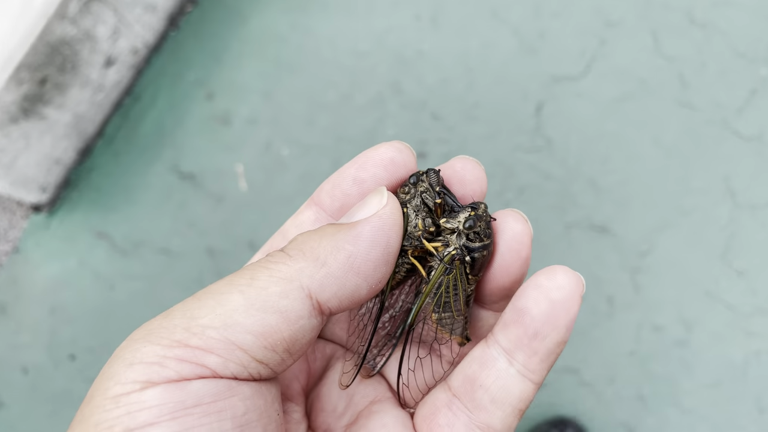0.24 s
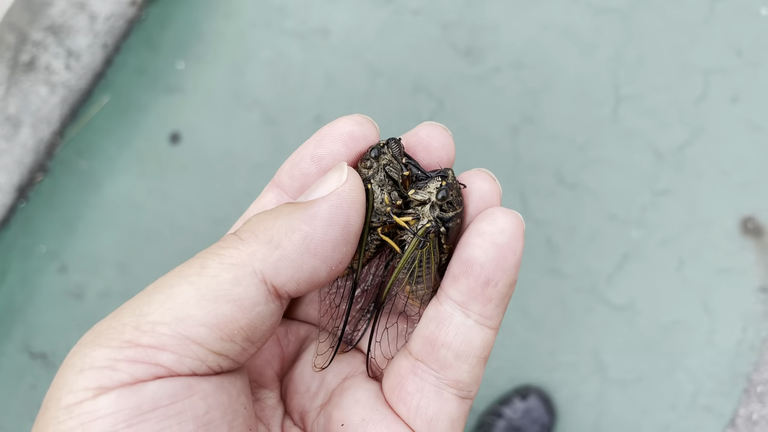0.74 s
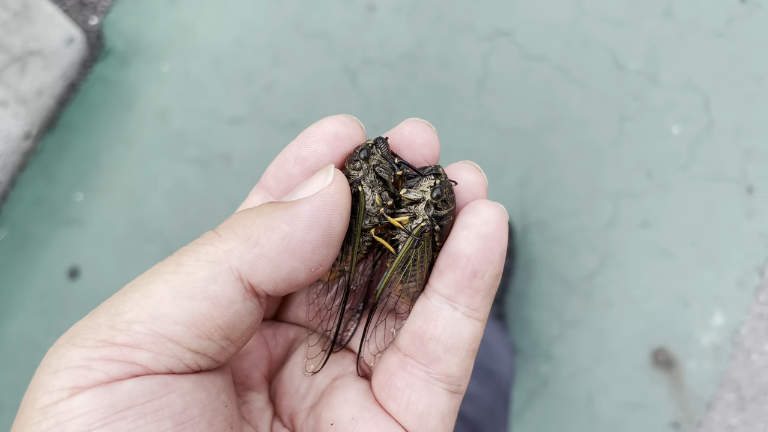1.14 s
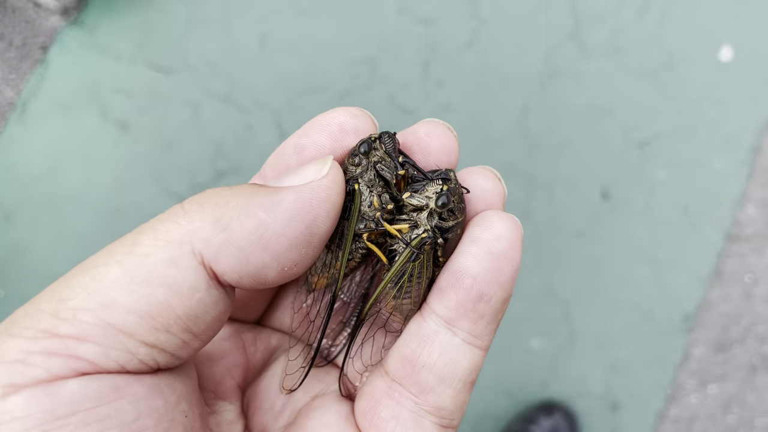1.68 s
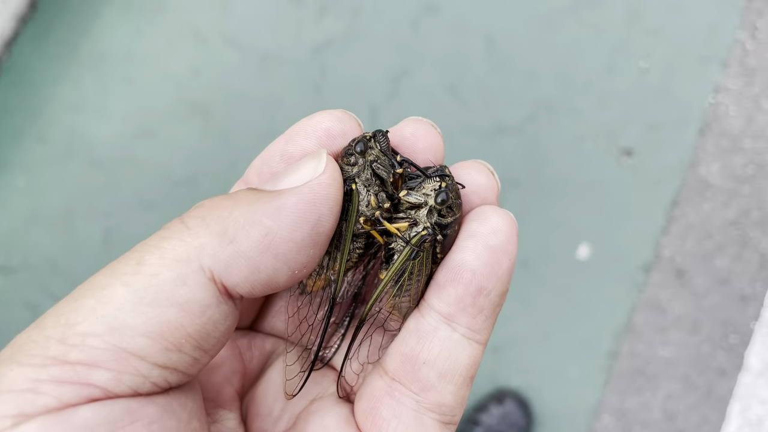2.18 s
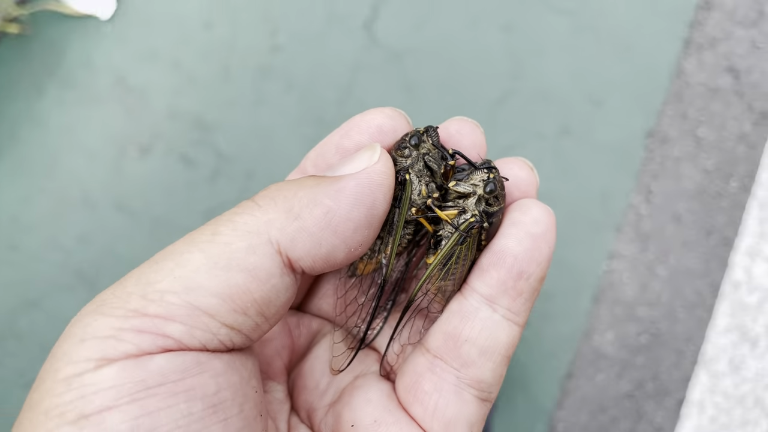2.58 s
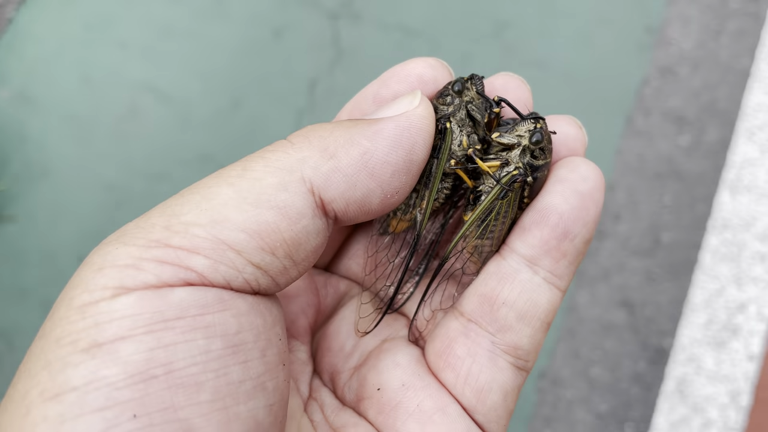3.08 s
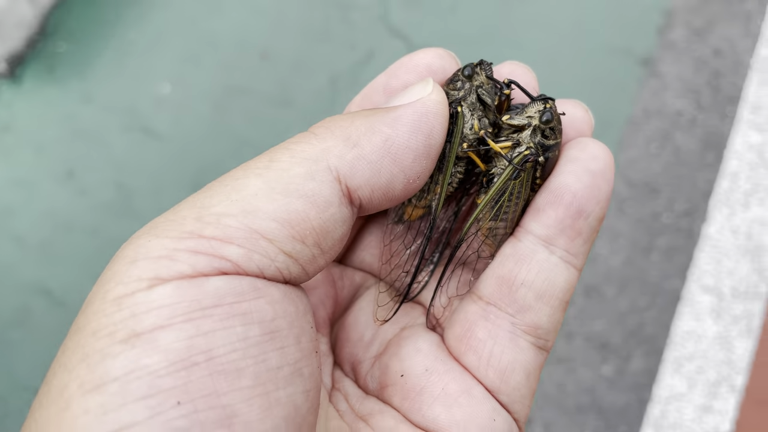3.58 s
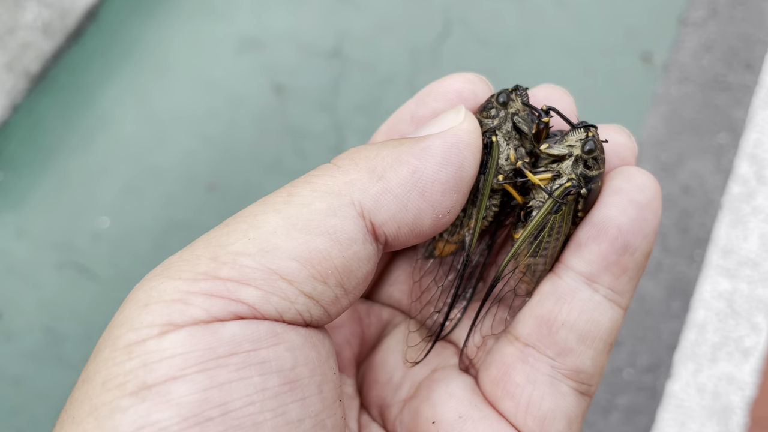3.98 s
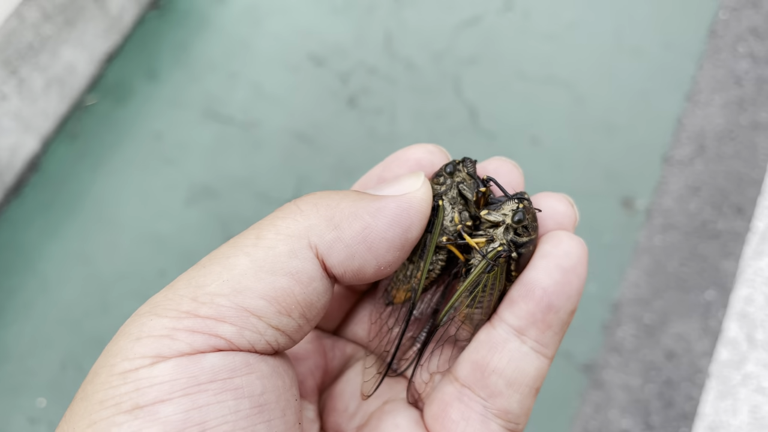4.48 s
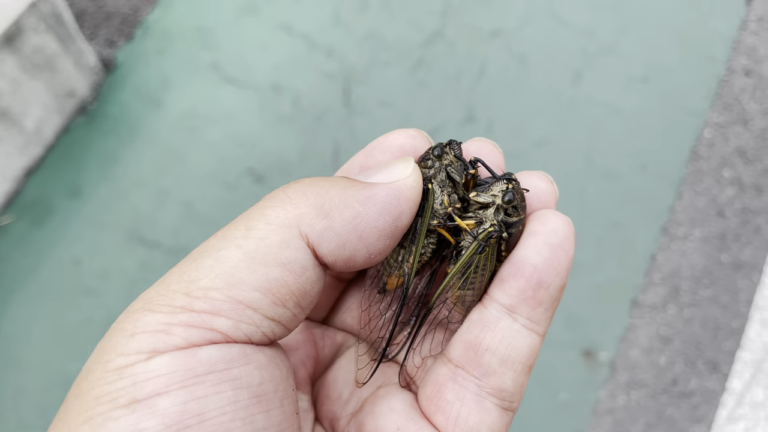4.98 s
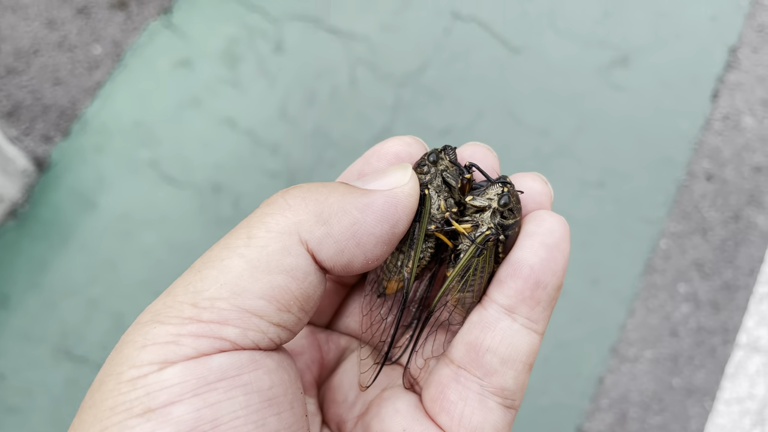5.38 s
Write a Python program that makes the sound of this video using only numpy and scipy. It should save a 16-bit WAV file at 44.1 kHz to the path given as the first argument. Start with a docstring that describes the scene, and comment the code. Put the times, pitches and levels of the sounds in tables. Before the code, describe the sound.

Close phone microphone outdoors: a hand-held cicada rasps in rapid bright ticks fused into buzzing bouts, alternating with slower sputtering clicks. It stops after roughly two and a half seconds. A quiet stretch holds only thin distant insect hiss, low town rumble and soft wind puffs. One brief buzz returns late, followed by two isolated dry clicks, and a stronger low wind thump closes the scene.

```python
"""A cicada buzzes loudly up close, stutters, falls quiet, then gives one last short burst and two clicks.
It is a large one, held in a hand close to a phone outdoors. Its two tymbals buckle in turn: in each stroke
the ribs snap one after another, each at its own pitch, then the plate springs back; the hollow abdomen
radiates the sound. A dull rustle goes with the strokes, and fingers and pavement scatter the buzz.
Distant cicadas, a town rumble, light wind and low bumps of the handled phone are shaped noise."""
import sys
import numpy as np
from scipy import signal
from scipy.fft import rfft, irfft, next_fast_len
from scipy.io import wavfile
from scipy.ndimage import uniform_filter1d

SR = 44100
rng = np.random.default_rng(int(sys.argv[2]) if len(sys.argv) > 2 else 0)


def store_pcm(level_fs):
    """Save levels as 16-bit WAV."""
    pcm = np.round(np.clip(level_fs, -1, 1) * 32767).astype(np.int16)
    wavfile.write(sys.argv[1], SR, np.atleast_2d(pcm).T)


N = 249165
TIME = np.arange(N) / SR
ACCENT_SPREAD_DB = 0.5  # slight random variation from stroke to stroke


def undb(db):
    """Decibels to gain."""
    return 10 ** (np.asarray(db) / 20)


def read(table, at):
    """The columns of a curve at the given places, joined by straight lines."""
    first, *columns = np.transpose(table)
    return [np.interp(at, first, column) for column in columns]


def level(table):
    """Gain over the whole scene from a (start_s, level_db) curve."""
    return undb(read(table, TIME)[0])


def over_bins(table, size):
    """The columns of a spectrum on the bins of a transform, joined on a log-frequency axis."""
    hz, *columns = np.transpose(table)
    bins = np.maximum(np.fft.rfftfreq(size, 1 / SR), 1)
    return [np.interp(np.log(bins), np.log(hz), column) for column in columns]


def colour(x, spectrum, size=2048):
    """Minimum-phase filter: folding the cepstrum makes the given spectrum causal."""
    cepstrum = irfft(np.log(undb(over_bins(spectrum, size)[0])))
    cepstrum[1:size // 2] *= 2
    cepstrum[size // 2 + 1:] = 0
    response = irfft(np.exp(rfft(cepstrum)))[:size // 2]
    return signal.fftconvolve(x, response)[:N]


def walk(rate):
    """Random levels held 1 / rate s and slewed twice; spread near 1."""
    hold = int(SR / rate)
    held = np.repeat(rng.standard_normal(N // hold + 1), hold)
    slewed = uniform_filter1d(uniform_filter1d(held, hold), hold)[:N]
    return slewed * np.sqrt(3 / 2)


def noise(spectrum):
    """Stereo noise of unit level with the given colour and width."""
    size = next_fast_len(N)
    mid_db, side_db = over_bins(spectrum, size)
    white = rfft(rng.standard_normal((2, size)))
    mid, side = irfft(white * undb([mid_db, mid_db + side_db]), size)[:, :N]
    pair = np.array([mid + side, mid - side])
    return pair / pair.std()


# bouts of buzzing, each a curve of the muscle's pace: start_s, pace (strokes per s of each tymbal)
BOUT_PACES = [
    [(-0.0014, 59.5), (0.024, 75.9), (0.0641, 63.0), (0.1182, 72.5), (0.176, 73.2), (0.2093, 84.3),
     (0.2468, 72.0), (0.3549, 47.5)],
    [(0.6585, 57.8), (0.7225, 50.7)],
    [(0.8984, 47.0), (1.0069, 62.6), (1.0535, 63.0), (1.0985, 50.1)],
    [(1.4731, 67.8), (1.5105, 55.0), (1.5668, 76.4), (1.6162, 46.3), (1.6592, 89.5), (1.7352, 62.9),
     (1.7847, 65.6), (1.8221, 49.2), (1.8866, 65.6), (1.9363, 37.3)],
    [(2.0986, 56.5), (2.1453, 48.2)],
    [(4.4885, 69.4), (4.5358, 69.4), (4.5652, 46.9), (4.5939, 41.4)],
]
# the second tymbal's lag beyond a fixed delay, one value per bout: share of the muscle cycle
LAG_SHARES = [.26, .29, .28, 0.25, 0.28, 0.2]
LAG_MS, JITTER_MS = 3.0, 0.059  # fixed part of the lag; random timing spread of every stroke


def bout(pace, lag_share):
    """Strokes (s, accent dB) of both tymbals: the first fires once a muscle cycle, the second a little later."""
    t = np.arange(pace[0][0], pace[-1][0], 1 / SR)
    rate, = read(pace, t)
    cycles = np.cumsum(rate) / SR
    fires = np.diff(np.floor(cycles), prepend=-1) > 0
    lag = LAG_MS / 10 ** 3 + lag_share / rate[fires]
    chance = rng.standard_normal((fires.sum(), 4)).T
    first_jitter, second_jitter = JITTER_MS / 10 ** 3 * chance[:2]
    accents = ACCENT_SPREAD_DB * chance[2:]
    first = np.c_[t[fires] + first_jitter, accents[0]]
    second = np.c_[t[fires] + lag + second_jitter, accents[1]]
    return first, second


def bouts():
    """All the buzzing: a list of stroke runs for each of the two tymbals."""
    return zip(*(bout(pace, share) for pace, share in zip(BOUT_PACES, LAG_SHARES)))


# how the insect holds its body: start_s, pose (index, slides between rib tables),
# tension (pitch factor), overtone_db (added to each rib's own overtone)
POSTURE = [(0, 0, 1, -1.5), (.3, 0.25, 0.96, 6), (.55, 0.11, 1.0, 3), (1.05, 0.045, 0.98, 2),
           (1.2, 0.16, 1, 1), (1.3, 0.87, 1, 2), (1.65, 0.99, 0.96, 3), (2.0, 1.08, 0.99, 1.5),
           (2.4, 0.85, 0.96, 2), (4.45, 1.9, 0.97, 1), (4.8, 1.95, 0.99, 1.5)]


def tymbal(strokes, poses, overtone_hz, slip_ms, scatter_db, detune, size=320):
    """Each stroke (s, dB) is a run of rib snaps; each snap swells and dies within a few cycles."""
    when, accent_db = np.transpose(strokes)
    pose, tension, bright_db = read(POSTURE, when)

    # rib timing and pitch slide from one pose to the next; the last pose holds beyond its index
    pose_numbers = np.arange(len(poses))
    blend = np.array([np.interp(pose, pose_numbers, one) for one in np.eye(len(poses))])
    ribs = np.einsum("ps,prc->csr", blend, np.array(poses))
    rib_ms, rib_hz, rib_db, peak_ms, overtone_db = ribs[..., None]

    # every snap is slightly off in time, force and pitch
    slip, force, pitch = rng.standard_normal((len(when), 3, len(poses[0]), 1)).swapaxes(0, 1)
    index = (when * SR).astype(int)[:, None] + np.arange(size)
    now_ms = (index / SR - when[:, None])[:, None] * 10 ** 3
    age_ms = np.maximum(now_ms - rib_ms - slip_ms * slip, 0)
    turn = 2 * np.pi * age_ms / 10 ** 3 * tension[:, None, None] * (1 + detune * pitch)

    low = age_ms / peak_ms
    high = low * 1.5  # the overtone swells and dies faster
    snaps = low * np.exp(1 - low) * np.sin(turn * rib_hz)
    overtone_gain = undb(overtone_db + bright_db[:, None, None])
    snaps += overtone_gain * high * np.exp(1 - high) * np.sin(turn * overtone_hz)

    run = (snaps * undb(rib_db + scatter_db * force)).sum(axis=1)
    sound = undb(accent_db)[:, None] * run
    inside = (index >= 0) & (index < N)
    return np.bincount(index[inside], sound[inside], N)


# snaps of one stroke, the last is the spring back; one list per pose. Pitch is before tension and detune,
# overtone before posture, level before scatter: snap_ms (into the stroke), pitch_hz, level_db,
# peak_ms (swell time to the peak), overtone_db (against the snap)
FIRST_RIBS = [
    [(-0.07, 7050.0, -14.5, 0.33, -6.4), (0.672, 5200.0, -14.7, 0.09, -8.2),
     (1.173, 7310.0, -11.5, 0.1, -5.3), (1.478, 4430.0, -14.0, 0.21, -6.0),
     (2.282, 5230.0, -14.7, 0.09, 3.7), (2.805, 4300.0, -11.7, 0.15, -7.2),
     (3.838, 8280.0, -9.6, 0.16, -7.1)],
    [(0.194, 8440.0, -14.5, 0.14, -1.7), (0.603, 6410.0, -11.7, 0.1, -19.0),
     (1.017, 6220.0, -14.4, 0.15, -1.2), (1.588, 4980.0, -13.6, 0.18, -6.9),
     (2.126, 7800.0, -20.5, 0.31, -6.1), (2.642, 4000.0, -12.9, 0.22, -18.0),
     (3.72, 6890.0, -17.4, 0.33, -4.3)],
    [(-0.05, 6020.0, -21.6, 0.33, -6.6), (0.536, 5460.0, -18.8, 0.27, -11.1),
     (1.066, 6670.0, -19.4, 0.15, 0.4), (1.492, 5020.0, -20.0, 0.25, -8.5),
     (2.148, 7800.0, -14.9, 0.16, -18.0), (2.688, 4160.0, -13.6, 0.29, -23.8),
     (3.832, 7230.0, -18.6, 0.27, -7.1)],
]


def first_tymbal(strokes):
    """The leading plate, buckling in the bouts and the stutters; its snaps also voice the single clicks."""
    return tymbal(strokes, FIRST_RIBS, overtone_hz=10800, slip_ms=.009, scatter_db=.5, detune=.008)


# the second plate's snaps, one list per pose, same columns:
# snap_ms, pitch_hz, level_db, peak_ms, overtone_db
SECOND_RIBS = [
    [(0.021, 9300.0, -16.3, 0.27, -17.0), (0.264, 6740.0, -16.4, 0.18, -5.1),
     (1.278, 7650.0, -13.9, 0.1, -3.2), (1.423, 4800.0, -16.2, 0.31, -7.6),
     (2.114, 7800.0, -23.2, 0.3, -2.5), (2.708, 3980.0, -13.4, 0.33, -12.3),
     (3.608, 7670.0, -17.6, 0.33, -3.0)],
    [(0.251, 6520.0, -16.4, 0.18, -4.6), (0.788, 4900.0, -16.1, 0.08, -8.5),
     (1.042, 8800.0, -13.3, 0.15, -19.0), (1.629, 4430.0, -12.4, 0.13, -13.3),
     (2.246, 6580.0, -15.2, 0.13, -5.8), (2.779, 4440.0, -10.8, 0.18, -12.5),
     (3.78, 7270.0, -15.2, 0.29, -6.9)],
]
# gain on the second plate: start_s, level_db
SECOND_DB = [(0, 2), (2.2, 0), (4.5, -1.5)]


def second_tymbal(strokes):
    """The following plate, buckling in the bouts; its one lone click, at 1.33 s, is voiced with the first
    plate's snaps."""
    plate = tymbal(strokes, SECOND_RIBS, overtone_hz=10600, slip_ms=.011, scatter_db=.6, detune=.01)
    return level(SECOND_DB) * plate


# radiation of the hollow abdomen in the cupped hand: freq_hz, level_db
BODY = [(600, -52), (1500, -26), (1900, -29.5), (2200, -14.5), (2600, -15.5), (3100, -6), (3600, -2),
        (4600, -0.94), (5800, 0), (7300, -1), (9500, -0.5), (12000, -3.5), (14000, -1.5), (16000, -34)]
# how hard the muscles pull: start_s, level_db
EFFORT = [(0, -0.7), (.35, -2.16), (.6, -0.05), (1.3, -0.43), (2.1, -0.57), (2.4, -2.2), (4.8, -0.2)]


def cicada():
    """Both tymbals sound through the abdomen; the stutters and single clicks are played with the first plate's
    snaps, though the click at 1.33 s belongs to the second plate."""
    first, second = bouts()
    lead = first_tymbal(np.vstack([*first, single_strokes()]))
    follow = second_tymbal(np.vstack(second))
    return colour(lead + follow, BODY) * level(EFFORT)


# colour and width of the dull rustle: freq_hz, level_db (per Hz, relative), side_db (side minus mid)
RUSTLE = [(70.4, -18, -13), (140, -3, -24), (283, 3, -27), (604, -5.5, -13), (800, -1, 3), (990, -11, -23),
          (1680, -6.5, 8), (2550, -17.5, -9)]


def rustle_with(buzz):
    """Dull noise whose strength follows the smoothed size of the buzz."""
    strength = uniform_filter1d(np.abs(buzz), size=384)
    return undb(-34.5) * noise(RUSTLE) * strength


def reflections(x, t60, db, size=8192):
    """Diffuse scatter: two independent noise tails of set energy, falling 60 dB in t60 seconds."""
    tail = rng.standard_normal((2, size)) * np.exp(-np.log(1000) * TIME[:size] / t60)
    tail /= np.sqrt((tail ** 2).sum(axis=1, keepdims=True))
    return undb(db) * signal.fftconvolve(x[None], tail, axes=1)[:, :N]


# colour and width of the distant cicadas: freq_hz, level_db (per Hz, relative), side_db (side minus mid)
CHORUS = [(1490, -28, 10), (2750, -21.5, -27), (3125, -13, -3), (3520, -2, 0.5), (4020, -4, -3),
          (4930, 4.5, -8.5), (5400, 0.5, -1), (7040, -0.5, -5.5), (8600, 2.5, -21), (11960, -6.5, 4),
          (12900, -9, -21), (14900, -43, -16)]
# their loudness, before a small random shimmer: start_s, level_db
CHORUS_DB = [(0, -52.5), (1.3, -56.5), (2.0, -55), (3.0, -51), (4.2, -50), (5.0, -50), (5.65, -48.5)]


def distant_cicadas():
    """Far insects merge into a hiss whose level shimmers quickly."""
    shimmer_db = .5 * walk(120)
    return noise(CHORUS) * level(CHORUS_DB) * undb(shimmer_db)


# colour and width of the town rumble: freq_hz, level_db (per Hz, relative), side_db (side minus mid)
TOWN = [(60.3, -24, -13), (129, -0.5, -10), (249, -1, -9), (417, -4.5, -1.5), (660, -11, 2.5),
        (785, -11.5, 4), (1080, -16.5, 7), (1780, -23.5, 1), (3000, -39, -21)]
# its loudness: start_s, level_db
TOWN_DB = [(0, -88), (.55, -68.5), (1.1, -63.5), (1.7, -68.5), (2.3, -67.5), (2.7, -67), (3.3, -64.5),
           (4.3, -66), (5.65, -64.5)]


def town_rumble():
    """Low noise with a drifting level."""
    return noise(TOWN) * level(TOWN_DB)


# the steady breeze, before its flutter: start_s, level_db
BREEZE_DB = [(0, -62), (.5, -69.5), (1.1, -60.5), (2.0, -57.5), (2.6, -64.5), (3.6, -61), (5.65, -58)]
# puffs of air and, in the first two seconds, low bumps of the handled phone; level is before the trim:
# start_s (of full strength), length_s (at full strength), level_db
PUFFS_AND_BUMPS = [(0.05, .07, -57.5), (1.04, .08, -59), (1.51, .06, -56), (3.448, 0.04, -52.5),
                   (3.539, 0.039, -51.5), (4.1, .06, -53), (4.27, 0.016, -53), (4.936, .05, -54),
                   (5.083, 0.04, -49), (5.442, 0.05, -52), (5.592, .061, -44)]
EDGE_S, TRIM_DB = 0.027, -0.5  # edge: fade before and after each puff or bump
FLUTTER_PER_S, FLUTTER_DB = 8.7, 2.5


def low_noise_strength():
    """A fluttering breeze, or the puff or bump above it, which swells, holds and fades."""
    breeze = level(BREEZE_DB) * undb(FLUTTER_DB * walk(FLUTTER_PER_S))
    swells = np.zeros(N)
    for start, length, db in PUFFS_AND_BUMPS:
        end = start + length
        corners = [start - EDGE_S, start, end, end + EDGE_S]
        swells += undb(db + TRIM_DB) * np.interp(TIME, corners, [0, 1, 1, 0])
    return np.maximum(breeze, swells)


# colour and width shared by wind and bumps: freq_hz, level_db (per Hz, relative), side_db (side minus mid)
WIND = [(20, -32, -21), (35.7, -6, -10), (50.7, -4.5, -18), (64.5, 2.5, -23), (84, -4.5, -9),
        (129, -5.5, -13.5), (204, -20.5, -4), (406, -50.5, -15)]


def wind_and_handling():
    """Moving air on the microphone and bumps of the phone, both as one low noise that swells and fades."""
    return noise(WIND) * low_noise_strength()


# stutters, even runs of single strokes: start_s, strokes (count), spacing_ms
STUTTERS = [(0.3663, 3, 20.9), (0.4315, 2, 23.5), (0.7373, 5, 22.7), (0.8534, 2, 11.8), (1.1128, 4, 21.8),
            (1.3015, 6, 21.7), (1.4288, 2, 20.1), (1.9503, 3, 22.2), (2.0575, 3, 10.6), (2.159, 3, 24.0),
            (2.2355, 2, 15.0), (2.274, 2, 9.5), (2.333, 3, 25.2)]
# single clicks, some alone, some within or right beside a run or bout (the one at 1.3348 s is a lone stroke of
# the second plate): start_s
CLICKS = [0.5489, 0.6376, 1.1966, 1.2537, 1.3348, 4.4708, 4.6805, 4.8022]


def single_strokes():
    """Strokes (s, accent dB) played with the first tymbal's snaps and without a partner stroke: the stutters
    and the single clicks (the one at 1.33 s is a lone stroke of the second plate)."""
    runs = [start + np.arange(strokes) * spacing_ms / 10 ** 3 for start, strokes, spacing_ms in STUTTERS]
    when = np.concatenate([*runs, CLICKS])
    # a little stronger on average than a stroke in a bout
    accent_db = 0.42 + ACCENT_SPREAD_DB * rng.standard_normal(len(when))
    return np.c_[when, accent_db]


def scene():
    """The insect, its scatter off fingers (same at both ports) and pavement (all round), and the surroundings."""
    buzz = cicada()
    rustle = rustle_with(buzz)
    fingers = reflections(buzz, t60=0.012, db=-6.5)[0]
    pavement = reflections(buzz, t60=.027, db=-17)
    surroundings = distant_cicadas() + town_rumble() + wind_and_handling()
    return buzz + rustle + fingers + pavement + surroundings


# phase between the phone's two ports: freq_hz, lead_rad (by which left leads)
PORT_LEAD = [(1500, 0), (3600, .4), (5100, 1.05), (5900, -1.2), (6900, -1.5), (8100, -2.95), (8900, -3.25),
             (10700, -4.3), (12300, -5.45), (12900, -6.28)]
# level between the ports: freq_hz, balance_db (left minus right)
PORT_BALANCE = [(100, 1), (700, 2), (1500, 1), (2500, 13), (3600, 3), (5100, 5), (5900, 2), (7200, 5.5),
                (8800, -3), (16000, 3.7)]


def record(dry):
    """The two ports differ in phase and level with frequency; a steep low-pass cuts the top."""
    size = next_fast_len(N + SR // 10)
    lead = over_bins(PORT_LEAD, size)[0]
    balance_db = over_bins(PORT_BALANCE, size)[0]
    left = undb(balance_db / 2)
    right = undb(-balance_db / 2) * np.exp(-1j * lead)
    heard = irfft(rfft(dry, size) * np.array([left, right]), size)[:, :N]
    low_pass = signal.ellip(8, .2, 70, 16200, fs=SR, output="sos")  # ripple dB, stopband dB, cutoff Hz
    return signal.sosfilt(low_pass, heard)


dry = scene()
out = record(dry)
store_pcm(out)
```